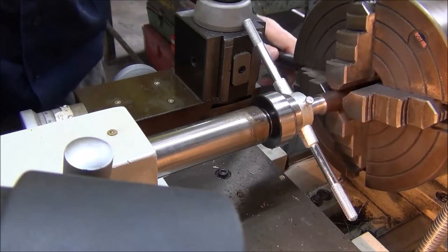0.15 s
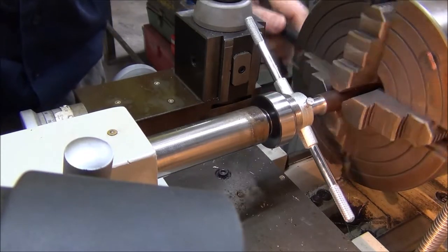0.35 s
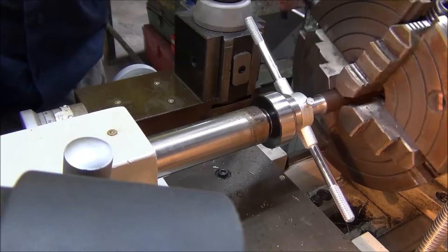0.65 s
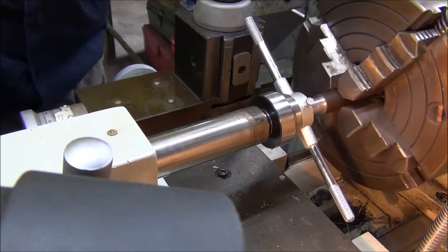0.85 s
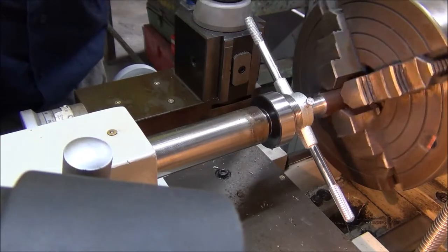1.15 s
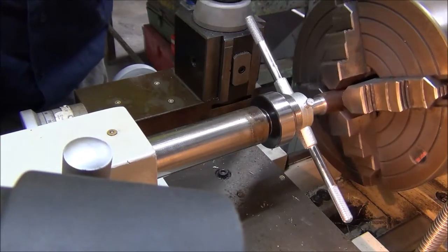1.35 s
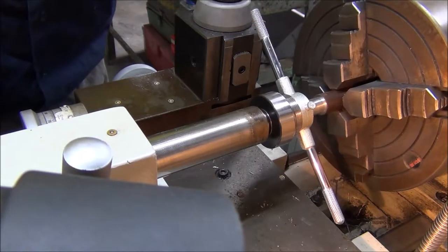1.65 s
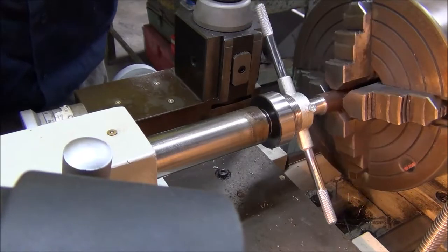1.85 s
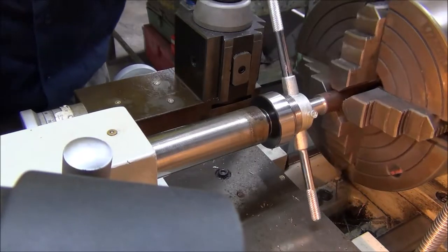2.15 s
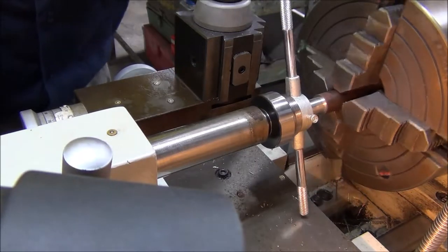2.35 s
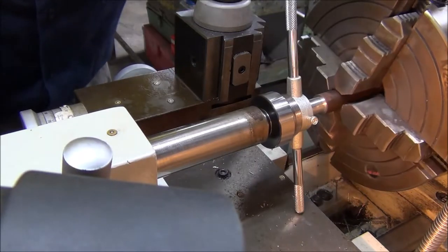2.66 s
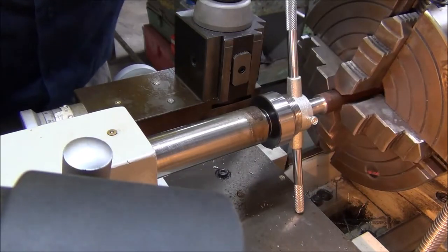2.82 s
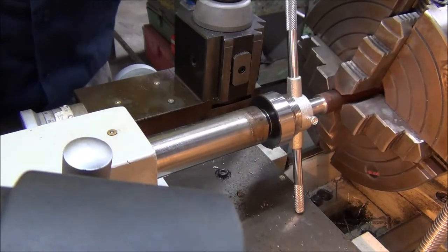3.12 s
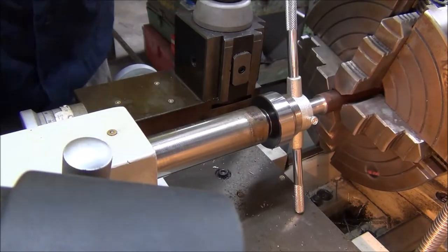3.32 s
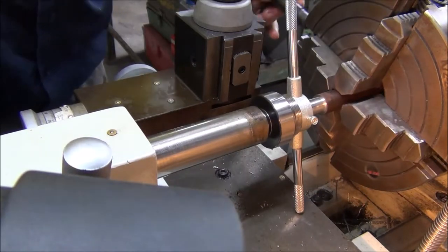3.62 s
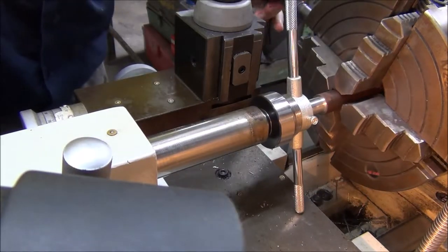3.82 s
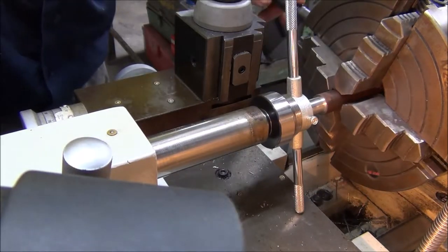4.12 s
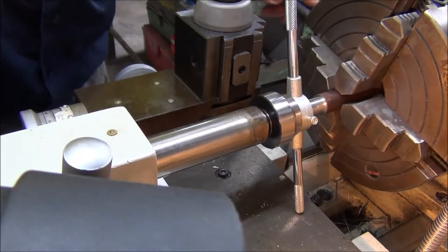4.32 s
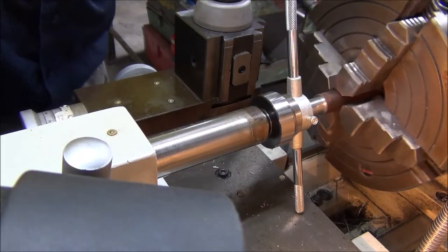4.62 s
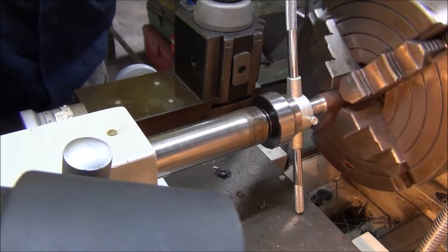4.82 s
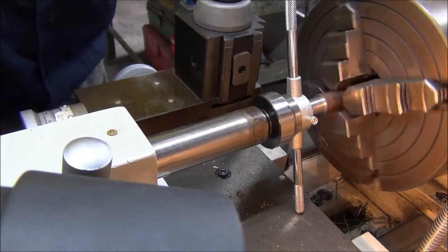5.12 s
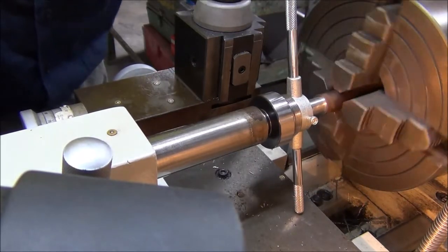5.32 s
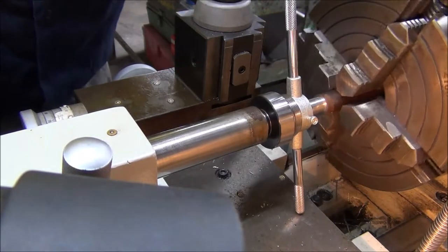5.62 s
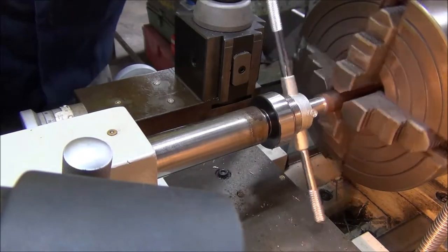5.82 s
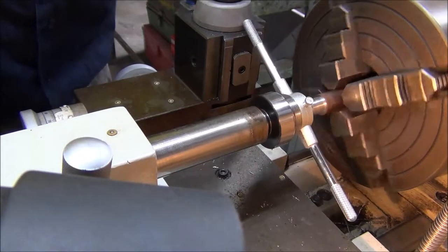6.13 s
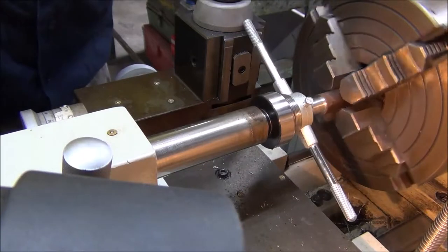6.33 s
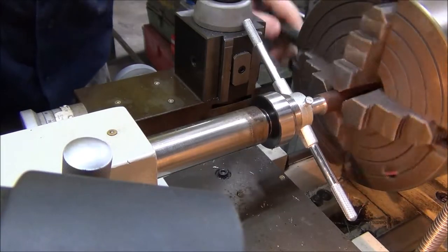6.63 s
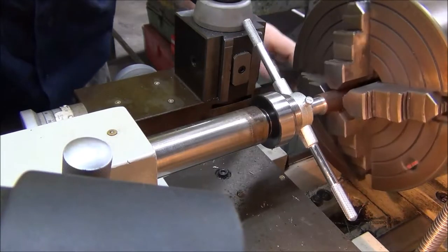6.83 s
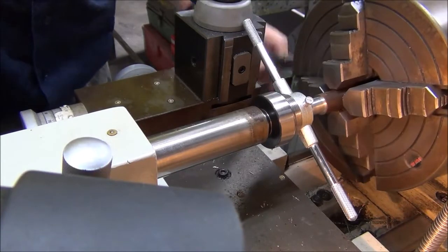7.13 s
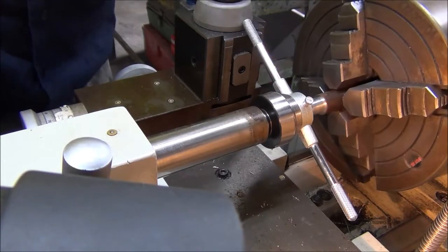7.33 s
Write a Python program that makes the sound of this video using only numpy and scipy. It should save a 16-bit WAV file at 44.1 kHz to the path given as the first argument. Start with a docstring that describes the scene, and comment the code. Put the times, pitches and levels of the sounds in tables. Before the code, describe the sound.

A lathe chuck is turned by hand against a threading die, heard close in a workshop with a short echo. In the first half second, several steel clacks come with booming knocks from the iron bed, the booms mostly on the right. Single clicks follow at about 1.8, 2.5 and 2.8 seconds, with faint sleeve brushing and a swell of rumble near 3 seconds. From 3.5 to 4.7 seconds comes a dense run of briefly ringing clacks and hollow thuds, loudest at 3.7 and 4.3. Softer knocks and brushing lead to a very sharp, loud clack at 6 seconds. The background dips briefly after the loudest hits. A low drone builds, strongest around 7 seconds, where a few lighter clicks sound. Mains hum, low rumble, soft room noise and a faint, very high whine continue throughout.

```python
"""A lathe chuck is turned by hand against a threading die in a quiet workshop.
Chuck key, die handle and gears clack, steel on steel; jolts make the iron bed boom, mostly on the right.
A sleeve or hand brushes past. Mains hum, a low drone, rumble and a scan-line whine sit in the room noise.
Gain control ducks everything after loud clacks."""
import sys
import numpy as np
from scipy import signal
from scipy.fft import rfft, irfft
from scipy.io import wavfile
from scipy.ndimage import uniform_filter1d

SR = 44100
rng = np.random.default_rng(int(sys.argv[2]) if len(sys.argv) > 2 else 0)


def store_pcm(level_fs):
    """Save levels as 16-bit WAV."""
    pcm = np.round(np.clip(level_fs, -1, 1) * 32767).astype(np.int16)
    wavfile.write(sys.argv[1], SR, np.atleast_2d(pcm).T)


N = 329427


def amp(db):
    return 10 ** (np.asarray(db) / 20)


def unit_rms(x):
    return x / np.sqrt(np.mean(x ** 2) + 1e-20)


def curve_at(points, hz):
    point_hz, value = np.transpose(points)
    return np.interp(np.log(hz + 1), np.log(point_hz + 1), value)


def add(mix, start_s, sound):
    part = mix[:, round(start_s * SR):][:, :sound.shape[1]]
    part += sound[:, :part.shape[1]]


def pan(left_db):
    return amp(np.multiply.outer([.5, -.5], left_db))


def bandpass(x, lo_hz, hi_hz):
    return signal.sosfilt(signal.butter(2, [lo_hz, hi_hz], "bandpass", fs=SR, output="sos"), x)


def excitation(hz, struck_hz, octaves, floor_db):
    """A blow drives the modes near one pitch most, the others weakly."""
    return amp(floor_db) + np.exp(-(np.log2(hz / struck_hz) / octaves) ** 2)


# Mode clusters of key, handle and chuck. Each row: centre in Hz, half-width in Hz.
STEEL_MODES = [(1168, 40), (1390, 50), (1560, 60), (1780, 80), (2250, 60), (2570, 110), (3100, 90),
               (3300, 70), (3630, 80), (3870, 90), (4160, 90), (4900, 60), (5600, 130), (6140, 50),
               (6850, 110)]
# Each row: start in seconds, level in dB, two struck pitches in Hz, ring re crack in dB,
# tilt in dB per octave, treble in dB.
CLACKS = [ (0.097, -19, 3030, 3300, -7.5, -8.5, -24), (0.1834, -17, 2570, 3700, -2.5, -7.5, -34),
          (0.2445, -10.5, 1168, 1780, -19, -16, -30), (.3334, -19.5, 2250, 2570, -20, -13, -16),
          (.465, -28, 1780, 3630, -17, -9, -21), (1.3367, -35.5, 3020, 3970, 7.5, 3, 4),
          (1.7654, -17.5, 1800, 1570, -5, -7.5, -27), (2.4507, -15, 3100, 1780, -9.5, -4, -13),
          (2.791, -18.5, 5100, 6800, -7, -2.5, -25), (2.8028, -12, 4860, 6530, -4, -3.5, -29.5),
          (2.843, -30, 6850, 6850, 3, -6, -25), (3.49, -11.5, 1168, 6850, -10.5, -10.5, -18.5),
          (3.497, -22, 5740, 6850, 10.5, -14, -26), (3.506, -14, 1390, 5600, -17, -24, -26),
          (3.613, -40, 6850, 6140, 0, -3, -23), (3.6647, -12.5, 1400, 5600, -11.5, -7, -30),
          (3.673, -11.5, 6100, 5630, -11, -7.5, -21), (3.717, -30, 5600, 6850, -14, -13, -23),
          (3.724, -12, 4000, 5600, -13, -7, -23), (3.731, -13.5, 1780, 3120, -3, -6, -28),
          (3.7446, -1, 3870, 6850, -33, -3, -19), (4.003, -26, 1545, 1860, 4.5, -38, -19),
          (4.0166, -12.5, 2250, 2590, 7, -2, -12), (4.0357, -10.5, 2620, 2570, -2.5, -6.5, -8),
          (4.18, -29, 2540, 2570, 9, -10, 1), (4.26, -33, 2600, 2570, 11, -6, -16),
          (4.3003, -23, 1780, 3190, -6, -6.5, -8), (4.3352, 3.5, 1250, 2250, -32, -1, -8.5),
          (4.6, -42, 4900, 3100, -1, 1, -20), (4.6942, -13.5, 3030, 4106, -6, -1, 3),
          (5.67, -29.5, 1460, 3870, -16, -5, -32), (5.6955, -28.5, 1780, 3080, -9.5, -15, -26),
          (5.734, -11, 1780, 3800, -25, -15.5, -28), (5.8218, -19.5, 1700, 2840, -7, -21, -26.5),
          (5.901, -21, 2250, 2430, -1.5, -14.5, -27), (6.0392, 5, 4900, 5600, -43, 4, 2),
          (6.88, -46, 2230, 2250, 8, -9, -9), (6.9672, -18.5, 1390, 1390, -3, -5, -16),
          (6.992, -12, 6380, 6020, -0.5, -3, -36), (6.999, -12, 6850, 6140, -9, -6, -25)]


def clack(db, first_hz, second_hz, ring_db, tilt_db_oct, treble_db):
    """Steel on steel: a noise crack, then a rough ring near the two struck pitches."""
    t = np.arange(SR // 4) / SR
    hz = np.fft.rfftfreq(len(t), 1 / SR) + 1
    crack_t60_s = .039
    ring_t60_s = max(.079 * 2 ** (-ring_db / 11.5), .02)  # fainter rings last longer
    body = amp(tilt_db_oct * np.log2(hz / 3000)) / (1 + (800 / hz) ** 4) / (1 + (hz / 7800) ** 12)
    treble = amp(treble_db) * (hz > 3000) / (1 + (6000 / hz) ** 4) / (1 + (hz / 12000) ** 3)
    mode_hz, width_hz = np.transpose(STEEL_MODES)[:, :, None]
    drive = sum(excitation(mode_hz, pitch, octaves=.09, floor_db=-24) for pitch in (first_hz, second_hz))
    drive *= amp(tilt_db_oct / 3 * np.log2(mode_hz / 3000))  # dull blows favour low modes
    modes = (drive / (1 + ((hz - mode_hz) / width_hz) ** 2)).sum(0)
    shared, per_side = rng.standard_normal((2, 1, len(t))), rng.standard_normal((2, 2, len(t)))
    crack_noise, ring_noise = rfft(shared + .5 * per_side)
    crack = unit_rms(irfft(crack_noise * (body + treble), len(t))) * amp(-60 * t / crack_t60_s)
    ring = unit_rms(irfft(ring_noise * modes, len(t))) * amp(ring_db - 60 * t / ring_t60_s)
    attack = np.minimum(t / .0016, 1)
    return pan(left_db=3.3)[:, None] * amp(db) * (crack + ring) * attack


# Bed modes, boom and hollow knock. Each row: pitch in Hz, level in dB, T60 factor, left re right in dB.
BOOM_MODES = [(150.4, -11, 2.17, 1), (179.3, -2.5, 1.79, -8), (207.4, -21, 1.28, -22.5),
              (228.8, -11.5, 3, -8.5), (250.4, -3.5, 0.82, -19), (295.7, -1.5, 1.34, -18),
              (317.8, -11.5, 5, -5), (325.4, -9, 1.5, -14.5)]
KNOCK_MODES = [(429.5, 18, 0.1, 29), (471, -7, 1.35, -6), (550, 6, 0.24, -41), (604.6, 4, 0.41, 29.5),
               (600.5, -11.5, 0.35, 18.5), (681, -1, 1.16, -1.5), (751, 3, 0.3, 0), (892, 5, 0.34, 3)]
# Each row: time in seconds, level in dB, struck pitch in Hz, knock gain in dB, rebound re jolt in dB.
JOLTS = [(0.11, -8, 266, -19.5, -25), (.141, -4, 142, -38, -8), (.249, -14.5, 265, 1, -5.5),
         (1.772, -24, 137, -16, -0.5), (2.467, -9, 323, -20, -41), (2.809, -22, 280, -11.5, -5),
         (3.501, 3, 225, -24, -9.5), (3.66, -6.5, 332, -25, 4.5), (3.758, -3, 283, -17, -17.5),
         (3.858, -25, 271, -1.5, -9), (4.036, -1.2, 271, -17, -5.5), (4.089, -12, 325, -40, -25),
         (4.192, -1.5, 266, -28, -16), (4.251, -12, 310, -30, -25), (4.318, -0.5, 192, -24.5, -18),
         (4.378, -4, 330, -14, -12), (4.447, -5.5, 262, -21.5, -6), (4.561, -19, 288, -16, -4),
         (4.695, -16.5, 306, -20.5, -.6), (4.977, -28.5, 312, -40, 2), (5.045, -18, 221, -31, -3),
         (5.279, -26, 300, -9, -9), (5.527, -11, 182, -21, -36), (5.746, -12, 280, -1, -13.5),
         (5.91, -22, 255, -31, -3.5), (6.058, -6.5, 274, -12, -34), (6.418, -13, 248, -20, -27),
         (6.971, -22.5, 267, -34.5, -2)]


def bed_jolt(db, struck_hz, knock_db, base_t60_s):
    """Heavy iron swells into its modes; they meet in phase once, then beat over a rolling hum."""
    t = np.arange(SR // 2) / SR
    hz, mode_db, t60_factor, left_db = np.transpose(BOOM_MODES + KNOCK_MODES)[:, :, None]
    is_boom = hz < 370
    t60_s, meet_s = base_t60_s * t60_factor, .016
    drive = np.where(is_boom, excitation(hz, struck_hz, octaves=.2, floor_db=-3.5), amp(knock_db))
    carrier = np.exp(2j * np.pi * (hz * (t - meet_s) + .18 * rng.standard_normal(hz.shape)))
    rise = np.sin(np.pi / 2 * np.minimum(t / meet_s, 1)) ** 2
    walks = rng.standard_normal((len(hz), len(t) // 441 + 1)).cumsum(1)  # loose parts unsettle each pitch
    drift_cycles = .07 * np.array([np.interp(t, np.arange(len(walk)) / 100, walk) for walk in walks])
    roll = np.exp(2j * np.pi * (rng.random(hz.shape) + drift_cycles)) * amp(-15 - 60 * t / (4.85 * t60_s))
    decay = amp(-60 * t / t60_s) + roll
    lag = np.exp(1j * np.multiply.outer([-1.6, 0], is_boom * hz / 300))  # boom trails on the left
    gains = pan(left_db) * amp(db + mode_db) * drive * lag
    return (gains * carrier * rise * decay).real.sum(1)


# Each row: centre in seconds, level in dB, half-width in seconds.
BRUSHES = [(2.333, -46, 0.39), (3.054, -43.5, 0.054), (3.427, -48.5, 0.037), (5.31, -44, 0.14),
           (5.865, -42.5, 0.15), (7.25, -50, 0.25)]


def brushes():
    """A sleeve or hand brushes past: soft swells of wide hiss."""
    t = np.arange(N) / SR
    swell = sum(amp(db) * np.exp(-((t - centre_s) / width_s) ** 2) for centre_s, db, width_s in BRUSHES)
    shared, per_side = rng.standard_normal(N), rng.standard_normal((2, N))
    return swell * unit_rms(bandpass(shared + .93 * per_side, 930, 8000))


# Each row: frequency in Hz, T60 in seconds.
SHOP_T60 = [(200, 0.89), (1000, 0.59), (3000, 0.24), (8000, 0.15), (15000, 0.16)]


def shop_reverb(x):
    """Sparse reflections of random sign; each band decays at its own rate."""
    taps = np.zeros((2, SR))
    delays = np.arange(200, SR - 20, 20) + rng.integers(0, 20, (2, (SR - 201) // 20))
    np.put_along_axis(taps, delays, rng.choice([-1., 1.], delays.shape), 1)
    taps = taps + .63 * taps[::-1]  # crossfeed
    hz, t, spectra = signal.stft(taps, SR, nperseg=256)
    decay = amp(-60 * t / curve_at(SHOP_T60, hz)[:, None])
    tail = signal.istft(spectra * decay, SR, nperseg=256)[1]
    return signal.fftconvolve(x, tail / np.linalg.norm(tail[0]), axes=1)[:, :N]


# Each row: frequency in Hz, RMS level in dB.
HUM_PARTIALS = [(50, -32), (100, -48), (150, -47.5)]


def mains_hum():
    """Steady mains harmonics, phase-shifted between the sides."""
    t = np.arange(N) / SR
    side_cycles = np.array([[0], [.15]])
    return np.sqrt(2) * sum(amp(db) * np.sin(2 * np.pi * (hz * t + rng.random() + side_cycles))
                            for hz, db in HUM_PARTIALS)


# Each row: time in seconds, RMS level in dB.
DRONE_LEVELS = [(4.4, -42), (4.7, -39), (6.0, -35), (6.2, -36.5), (6.8, -26.5), (7.25, -27.5), (7.47, -48)]


def drone(hz=82.5):
    """A low tone, perhaps a distant machine, swells near the end."""
    t = np.arange(N) / SR
    level = amp(np.interp(t, *np.transpose(DRONE_LEVELS), left=-90))
    return np.sqrt(2) * level * np.sin(2 * np.pi * hz * t) * pan(left_db=-3)[:, None]


# Each row: time in seconds, RMS level in dB.
RUMBLE_LEVELS = [(0, -22.5), (.6, -28.5), (1.7, -36.5), (1.85, -26), (2.7, -34.5), (2.9, -18), (3.2, -31.5),
                 (4.4, -20.5), (5.1, -27), (7.47, -36)]


def rumble():
    """Slow air pressure swings, unrelated on the two sides."""
    t = np.arange(N) / SR
    noise = unit_rms(bandpass(bandpass(rng.standard_normal((2, N)), 12, 63), 12, 63))
    return noise * amp(np.interp(t, *np.transpose(RUMBLE_LEVELS))) * pan(left_db=-.5)[:, None]


# Each row: offset in Hz, level re carrier in dB.
WHINE_SIDEBANDS = [(50, -10), (100, -13.5), (150, -22)]


def scan_whine(hz=15625, db=-51):
    """Scan-line tone with a gap fifty times a second."""
    t = np.arange(N) / SR
    gaps = 1 - 2 * sum(amp(side_db) * np.cos(2 * np.pi * offset_hz * t)
                       for offset_hz, side_db in WHINE_SIDEBANDS)
    return np.sqrt(2) * amp(db) * gaps * np.sin(2 * np.pi * hz * t)


# Each row: frequency in Hz, relative density in dB.
ROOM_SPECTRUM = [(39, -35), (66, -8), (102, -14), (203, -14.5), (267, -6.5), (368, -13.5), (766, -15.5),
                 (2100, -26), (14700, -37), (15800, -56)]
# Each row: frequency in Hz, left-right coherence.
ROOM_COHERENCE = [(60, .054), (400, .4), (15000, .098)]
# Each row: frequency in Hz, left re right in dB.
ROOM_PAN = [(60, -14), (250, -4.5), (1300, -.2)]


def room_noise(rms_db=-35, patch_db=2):
    """Wide noise with faint drifting patches in its spectrum."""
    frames, hz = N // 256 + 5, np.fft.rfftfreq(1024, 1 / SR)
    left_re, left_im, own_re, own_im, patches = rng.standard_normal((frames, 513, 5)).T
    patches = unit_rms(uniform_filter1d(uniform_filter1d(patches, 12, 0), 14, 1))
    coherence = curve_at(ROOM_COHERENCE, hz)[:, None]
    left = left_re + 1j * left_im
    right = coherence * left + np.sqrt(1 - coherence ** 2) * (own_re + 1j * own_im)
    colour = amp(curve_at(ROOM_SPECTRUM, hz)[:, None] + patch_db * patches)
    spectra = np.array([left, right]) * colour * pan(curve_at(ROOM_PAN, hz))[:, :, None]
    return amp(rms_db) * unit_rms(signal.istft(spectra, nperseg=1024, noverlap=768)[1][:, :N])


def scene():
    """Clacks and jolts echo in the shop over the background; each jolt rebounds once."""
    steel, iron = np.zeros((2, 2, N))
    for start_s, *blow in CLACKS:
        add(steel, start_s, clack(*blow))
    lead_s, rebound_s = .011, .04
    for time_s, db, struck_hz, knock_db, rebound_db in JOLTS:
        base_t60_s = .1 + .11 * min(amp(rebound_db), 1)  # a lively bounce rings longer
        add(iron, time_s - lead_s, bed_jolt(db, struck_hz, knock_db, base_t60_s))
        rebound = bed_jolt(db + rebound_db, struck_hz, knock_db - 2, base_t60_s)
        add(iron, time_s - lead_s + rebound_s, rebound)
    echoes = shop_reverb(amp(-8) * steel + amp(-12) * iron)
    return steel + iron + echoes + brushes() + room_noise() + rumble() + mains_hum() + drone() + scan_whine()


def peak_hold(db, release_db_s):
    fall_db = np.arange(N) * release_db_s / SR
    return np.maximum.accumulate(db + fall_db) - fall_db


def record(dry):
    """Gain control ducks on peaks, recovers part fast and the rest slowly; then clip and low-pass."""
    threshold_db, cutoff_hz = -1, 16550
    over_db = np.maximum(20 * np.log10(abs(dry).max(0) + 1e-9) - threshold_db, 0)
    slow_db = .7 * over_db
    slow_db[0] = 6  # starts turned down
    duck_db = np.maximum(peak_hold(over_db, release_db_s=40), peak_hold(slow_db, release_db_s=2.6))
    ducked = dry / amp(uniform_filter1d(duck_db, size=64))
    lowpass = signal.firwin(1023, cutoff_hz, window=("kaiser", 9), fs=SR)
    return signal.oaconvolve(np.clip(ducked, -.97, .97), lowpass[None], "same")


dry = scene()
out = record(dry)
store_pcm(out)
```